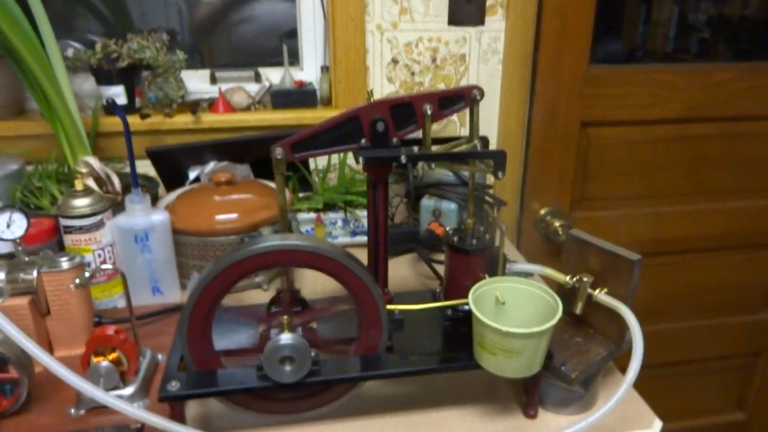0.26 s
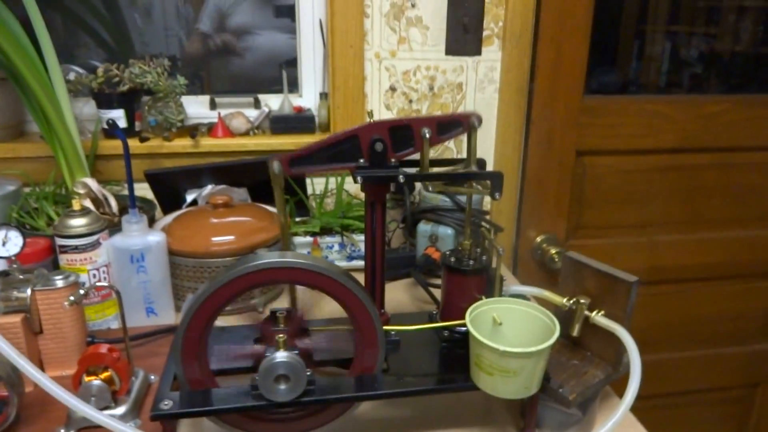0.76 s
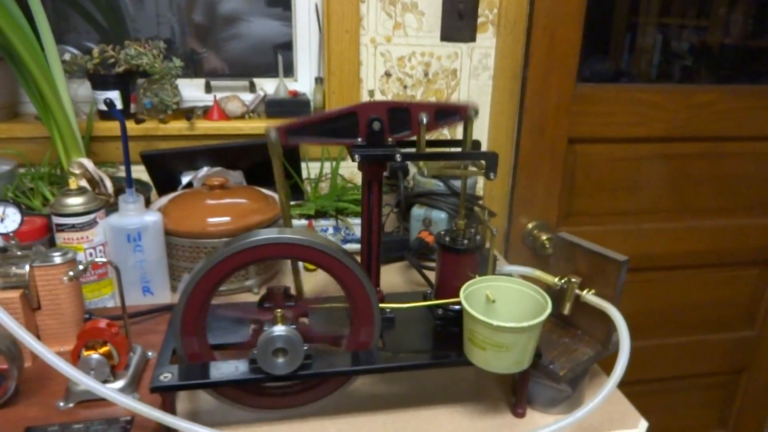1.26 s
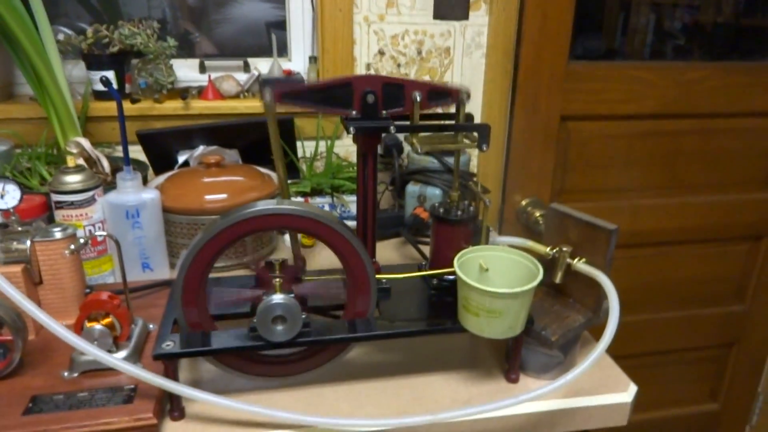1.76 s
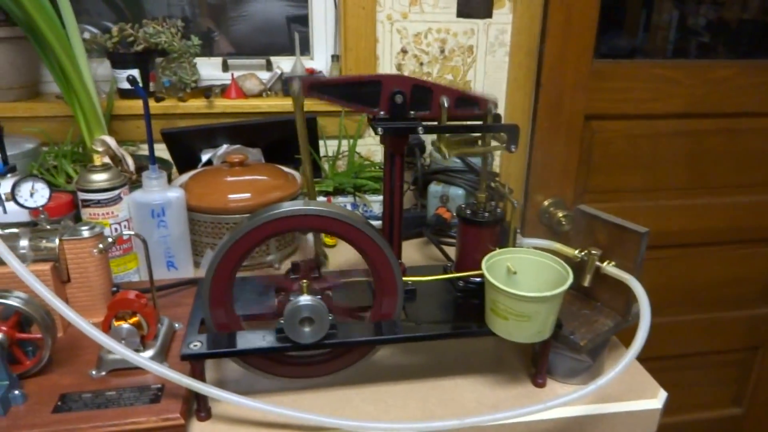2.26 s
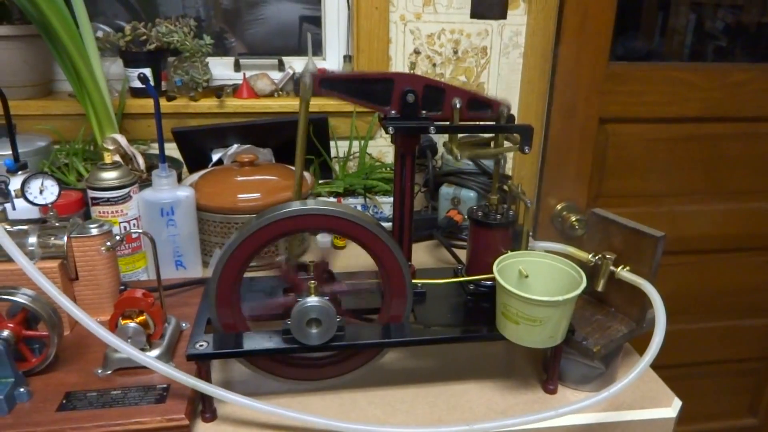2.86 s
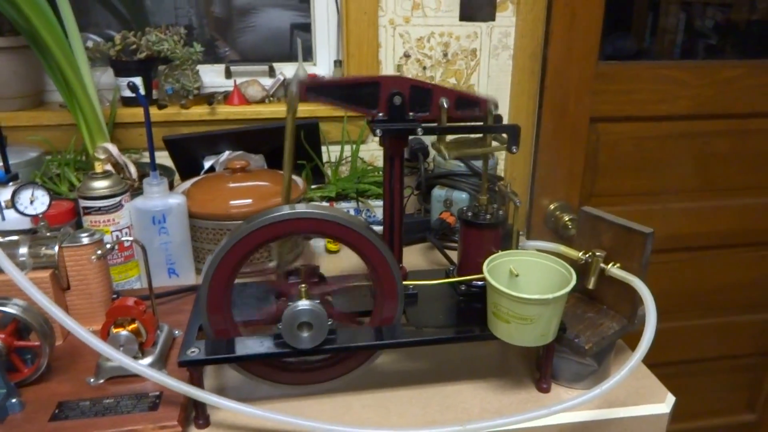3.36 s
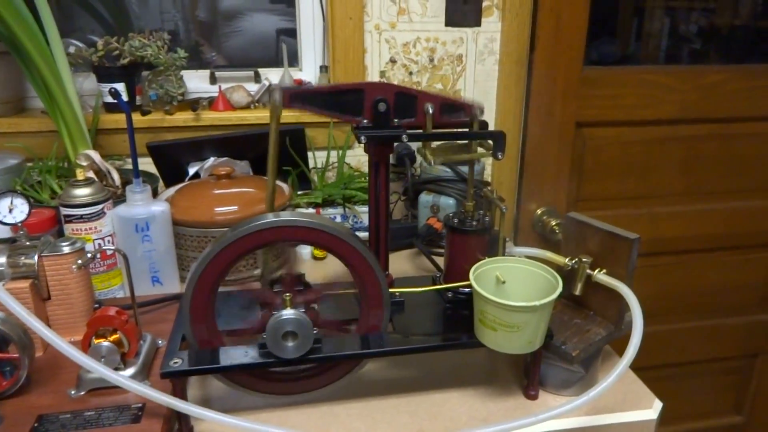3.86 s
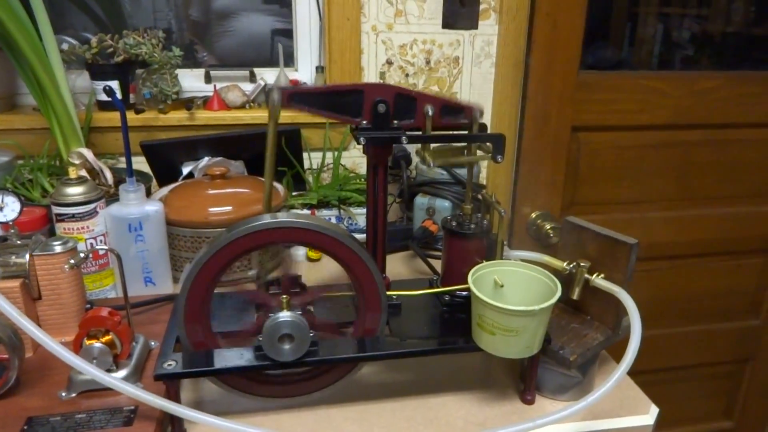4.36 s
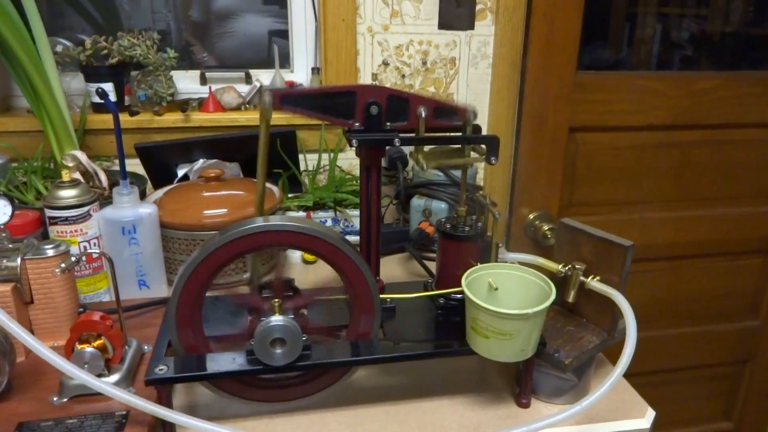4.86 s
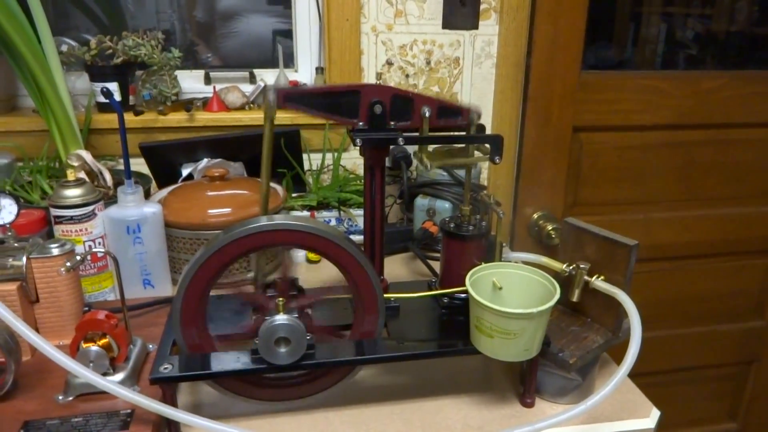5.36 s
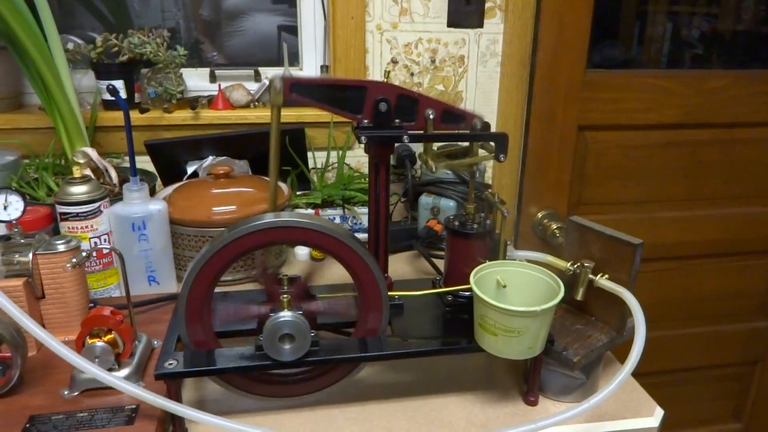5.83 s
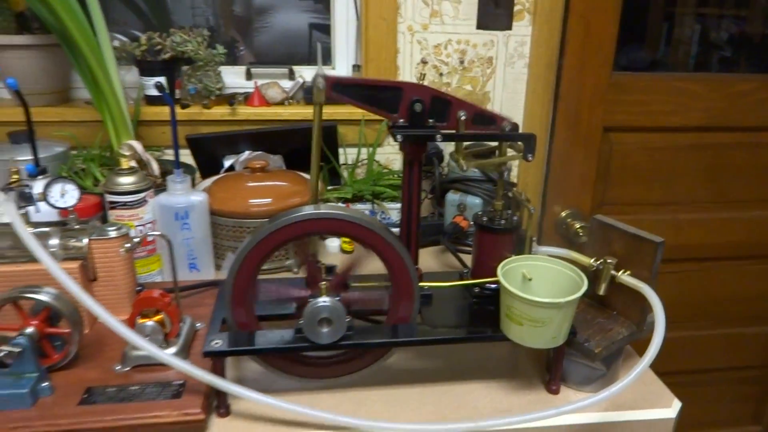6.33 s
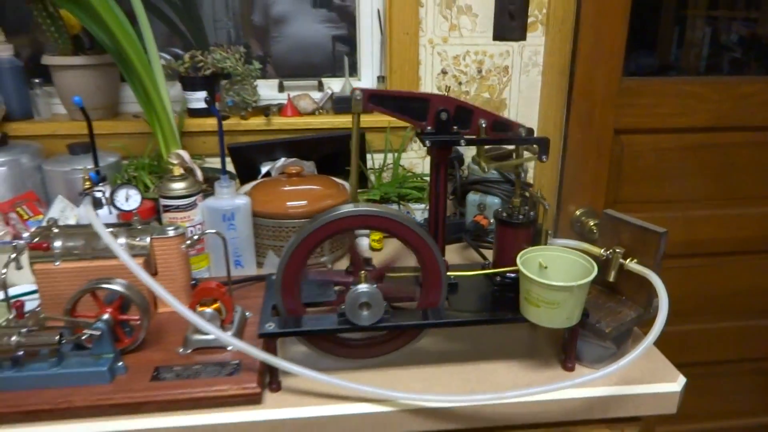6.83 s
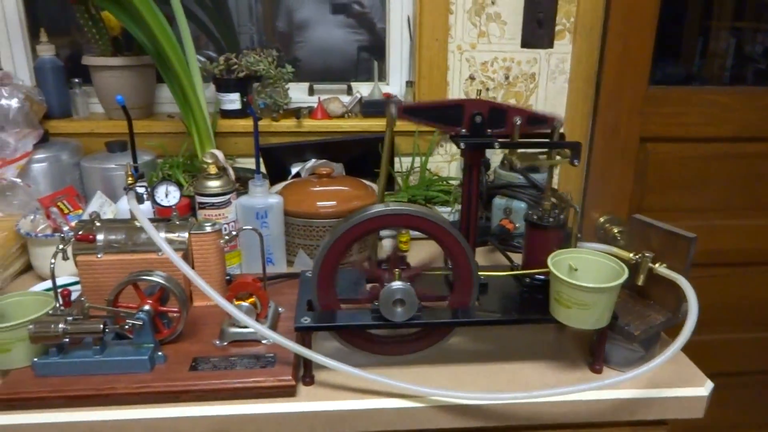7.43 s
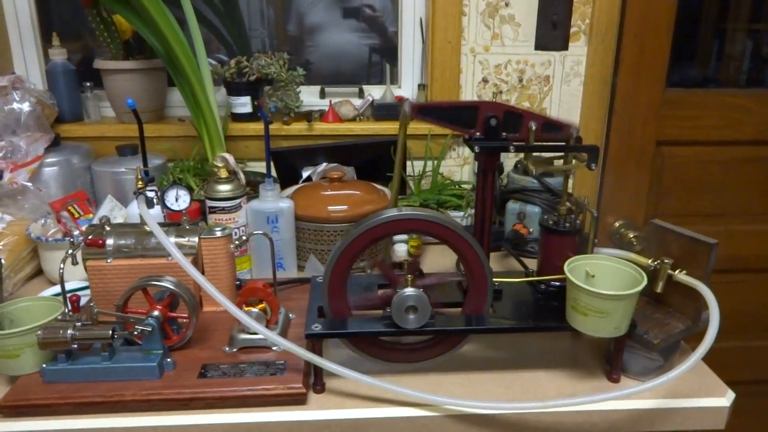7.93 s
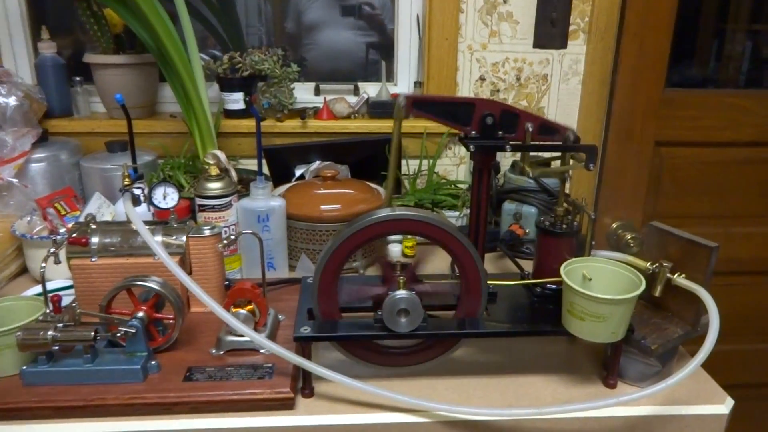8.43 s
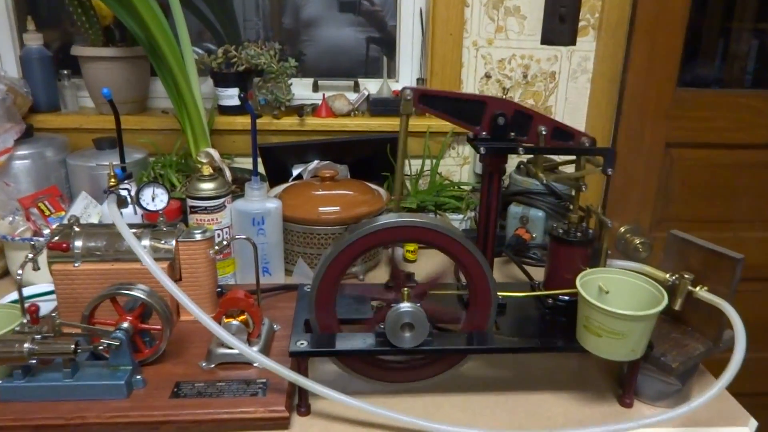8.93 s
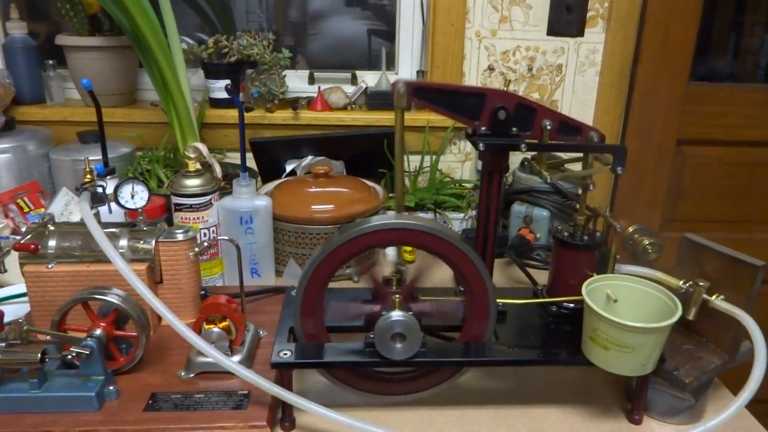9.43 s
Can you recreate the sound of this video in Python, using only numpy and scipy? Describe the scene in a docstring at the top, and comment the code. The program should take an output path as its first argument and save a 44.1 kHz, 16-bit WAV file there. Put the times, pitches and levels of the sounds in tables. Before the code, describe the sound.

Rhythmic mechanical knocks and quick puffs of steam come from a small beam engine running on a wooden table, gradually easing its pace.

```python
"""A small beam engine slowing down

The engine runs on a wooden table indoors. Five slack joints knock once a turn, and each impact excites
the modes of base and table. The exhaust chuffs twice a turn as turbulent noise, sputters in between and
pops drops of water in its pipe. The valve port whistles faintly; the room answers softly."""
import sys
import numpy as np
from scipy import signal
from scipy.fft import rfft, irfft, next_fast_len
from scipy.io import wavfile
from scipy.ndimage import uniform_filter1d

SR = 44100
rng = np.random.default_rng(int(sys.argv[2]) if len(sys.argv) > 2 else 0)


def master(y):
    """Save y as 16-bit WAV."""
    cut = np.clip(np.atleast_2d(y).T, -1, 1)
    pcm = np.round(cut * 32767)  # scale
    wavfile.write(sys.argv[1], SR, pcm.astype(np.int16))


N = 427329
TOP_HZ = 15800

# knocks of the two heavy joints: start_s, level_db
CRANK_KNOCKS = [(0.071, -11), (0.517, -12), (0.982, -13), (1.447, -11), (1.91, -12), (2.385, -12),
                (2.868, -13), (3.357, -11.5), (3.849, -11.5), (4.346, -13), (4.85, -12.5), (5.353, -12.5),
                (5.86, -12), (6.372, -11), (6.888, -11.5), (7.409, -13), (7.932, -13), (8.457, -12),
                (8.99, -13.5), (9.553, -13.5)]
PISTON_KNOCKS = [(0.35, -17.5), (0.802, -18.5), (1.265, -16.5), (1.729, -16.5), (2.195, -15.5),
                 (2.678, -18), (3.162, -15.5), (3.655, -15.5), (4.153, -17), (4.654, -16.5), (5.153, -15.5),
                 (5.66, -16), (6.173, -16), (6.685, -16.5), (7.204, -16), (7.724, -15.5), (8.252, -16.5),
                 (8.779, -15), (9.331, -15)]
# modes of base and table: pitch_hz, width_hz
BASE_MODES = [(66, 35), (150, 13), (188, 28), (253, 24), (345, 26), (410, 26), (530, 30), (645, 50),
              (720, 60), (782, 60), (870, 55), (925, 55), (1168, 75), (1280, 85), (1556, 90), (2000, 500)]
# The next three have one row per joint: crank, beam, valve, piston, link.
# drive of each mode: gain_db
MODE_COUPLING = [
    [-12.5, 1.5, -4.5, -1, -2.5, 1.5, -13.5, -7.5, -3, -1, -8.5, -23, -10, -32.5, -18, -45],
    [-21, 1, -8.5, 1, -5.5, -10, -12, -14, -21, -10, -12, -22, -9.5, -11, -18, -22.5],
    [-43, -3.5, 3, -4, -28, -41.5, -14, -1, -18, -1, 3, 2.5, -6.5, -13, -30.5, -80],
    [-39, 0, -7, -0.5, -2.5, -7, -14.5, -1, 1, -4.5, -6.5, -3.5, -7, -9.5, -9.5, -26],
    [-34, -3, -6, 2.5, -2, -21, -43, -4, -3, -6, -2.5, -3, -18, -11.5, -16, -27],
]
# contacts within one knock: delay_s, level_db
REBOUNDS = [
    [(.001, -2), (.005, -10.5), (.012, -1), (.031, -6.5), (.046, -12.5)],
    [(0, 0), (.009, -1.5), (.03, -9)],
    [(0, -5), (.007, -9.5)],
    [(0, -3.5), (.004, -1.5), (.009, -4.5), (.033, -9.5)],
    [(0, -2), (.005, -2.5), (.010, -1)],
]
# contact hardness, lower for heavy, oiled joints: cutoff_hz
CONTACT_CUTOFFS = [1140, 1990, 3950, 1980, 3900]


def knocks(boom_db=-3):
    """Modal superposition: every joint drives the same modes, each with its own weights."""
    beam = each_turn(phase=.139, level_db=-16.5, spread_db=.27)
    valve = each_turn(phase=.46, level_db=-31, spread_db=4)
    link = each_turn(phase=.818, level_db=-20.5, spread_db=.46)
    joints = [CRANK_KNOCKS, beam, valve, PISTON_KNOCKS, link]
    out = np.zeros(N)
    for strikes, rebounds, coupling, cutoff_hz in zip(joints, REBOUNDS, MODE_COUPLING, CONTACT_CUTOFFS):
        ring = resonances([(*mode, db) for mode, db in zip(BASE_MODES, coupling)])
        force = joint_force(strikes, rebounds)
        out += filtered(force, lambda hz: ring(hz) / (1 + 1j * hz / cutoff_hz) ** 2)
    # the hollow under the table swells after a blow and booms on
    return out + filtered(out, resonances([(*BASE_MODES[1], boom_db)]))


def joint_force(strikes, rebounds, gain_db=44, scatter_db=.84, chatter_db=-28, grind_db=-26):
    """Backlash: a slack joint strikes, rebounds and chatters while its bearing grinds steadily."""
    blows, envelope = np.zeros((2, N + SR))
    t = np.arange(SR // 8) / SR
    for start_s, db in strikes:
        envelope[round(start_s * SR):][:len(t)] += amp(db + gain_db + chatter_db) * np.exp(-t / .022)
        for delay_s, rebound_db in rebounds:
            blow_db = db + gain_db + rebound_db + scatter_db * rng.standard_normal()
            blows[round((start_s + delay_s) * SR)] += amp(blow_db)
    # light chatter is too quick to move the heavy low modes
    chatter = filtered(envelope[:N] * rng.standard_normal(N), lambda hz: highpass(hz, 400) ** 2)
    return blows[:N] + chatter + amp(grind_db) * patchy_noise(depth_db=3.5)


def each_turn(phase, level_db, spread_db, piston_phase=.607):
    """Phase locking: a light joint knocks a fixed fraction of a turn after the crank."""
    crank_s, piston_s = np.array(CRANK_KNOCKS)[:, 0], np.array(PISTON_KNOCKS)[:, 0]
    turns = np.arange(len(crank_s))
    known_turns = np.sort(np.r_[turns, np.arange(len(piston_s)) + piston_phase, len(turns)])
    known_s = np.sort(np.r_[crank_s, piston_s, 2 * crank_s[-1] - crank_s[-2]])
    starts = np.interp(turns + phase, known_turns, known_s)
    return [(s, level_db + spread_db * rng.standard_normal()) for s in starts if s < N / SR]


# exhaust puffs at each end of the stroke: start_s, level_db, fade_s
CHUFFS = [(0.066, -11.5, 0.04), (0.31, -10, 0.067), (0.5142, -11.5, 0.081), (0.778, -12.5, 0.067),
          (0.974, -11.5, 0.07), (1.2286, -10.5, 0.058), (1.4361, -13, 0.07), (1.695, -12.5, 0.077),
          (1.885, -15, 0.12), (2.164, -11.5, 0.053), (2.3725, -13, 0.08), (2.6394, -14, 0.089),
          (2.854, -12.5, 0.053), (3.126, -15.5, 0.078), (3.3403, -16.5, 0.12), (3.625, -11.5, 0.067),
          (3.8357, -12.5, 0.055), (4.1136, -12, 0.061), (4.3375, -13, 0.11), (4.6199, -12.5, 0.067),
          (4.821, -15, 0.094), (5.1074, -15, 0.089), (5.329, -12.5, 0.088), (5.627, -12, 0.067),
          (5.8491, -13, 0.08), (6.1325, -12.5, 0.081), (6.3494, -15.5, 0.13), (6.648, -11.5, 0.062),
          (6.8728, -14.5, 0.082), (7.172, -15.5, 0.079), (7.389, -16, 0.082), (7.695, -15, 0.072),
          (7.9174, -12.5, 0.075), (8.2174, -13.5, 0.077), (8.4457, -12.5, 0.054), (8.738, -12, 0.082),
          (8.9794, -15, 0.088), (9.296, -13.5, 0.064), (9.5387, -12.5, 0.062)]
# port opening at the crank end, then the piston end: rise_s, lead_s
PORT_OPENINGS = [(0.021, 0.01), (.011, 0.0064)]
# spurts of wet steam between chuffs: start_s, level_db, fade_s
SPUTTERS = [(0.0054, -20.5, 0.13), (0.124, -15.5, 0.049), (0.2244, -26, 0.059), (0.2643, -17.5, 0.047),
            (0.4289, -20.5, 0.05), (0.6394, -25.5, 0.063), (0.7193, -21.5, 0.15), (0.898, -23.5, 0.061),
            (1.0694, -21, 0.05), (1.1807, -24, 0.042), (1.3194, -20.5, 0.052), (1.3894, -25, 0.057),
            (1.5384, -21, 0.05), (1.6282, -23, 0.058), (1.7994, -24, 0.082), (2.1106, -19.5, 0.031),
            (2.2588, -19.5, 0.059), (2.4902, -20.5, 0.052), (2.5894, -22, 0.14), (2.9262, -19, 0.04),
            (2.9816, -23.5, 0.042), (3.055, -25, 0.14), (3.273, -22, 0.041), (3.5224, -25, 0.081),
            (3.5694, -16.5, 0.035), (3.7424, -23, 0.054), (3.7993, -21.5, 0.04), (3.9155, -21.5, 0.035),
            (3.9654, -23.5, 0.039), (4.0287, -24.5, 0.07), (4.1994, -21.5, 0.054), (4.2916, -22, 0.05),
            (4.442, -18.5, 0.029), (4.5311, -24.5, 0.069), (4.5885, -22.5, 0.05), (4.7194, -22.5, 0.045),
            (5.0215, -24, 0.12), (5.2694, -27, 0.064), (5.5687, -20, 0.029), (5.7728, -23, 0.094),
            (5.9194, -18, 0.034), (6.0526, -21, 0.064), (6.2991, -22, 0.068), (6.5494, -30, 0.067),
            (6.5994, -21.5, 0.037), (6.7294, -22.5, 0.072), (6.8154, -23.5, 0.087), (6.979, -21, 0.037),
            (7.0818, -24.5, 0.058), (7.3282, -23, 0.044), (7.4594, -20.5, 0.033), (7.5094, -25, 0.063),
            (7.5712, -25.5, 0.054), (7.6194, -23.5, 0.089), (8.0092, -16.5, 0.037), (8.0875, -22, 0.032),
            (8.165, -22, 0.13), (8.3294, -24, 0.043), (8.519, -21.5, 0.05), (8.5694, -24.5, 0.055),
            (8.6477, -23, 0.039), (8.6894, -23, 0.043), (8.8774, -23, 0.031), (8.9401, -24.5, 0.05),
            (9.0894, -19.5, 0.05), (9.1494, -27, 0.04), (9.2015, -27, 0.11), (9.403, -21.5, 0.036),
            (9.4394, -25.5, 0.093), (9.639, -29, 0.032)]


def steam_flow(fade_shape=1.34, leak_db=-40, sputter_rise_s=.0043, sputter_lead_s=.0035):
    """Incoherent addition: puffs and a slight leak sum in power to give the flow envelope."""
    power, t = np.zeros(N + SR), np.arange(SR // 2) / SR
    puffs = [(*row, *PORT_OPENINGS[k % 2]) for k, row in enumerate(CHUFFS)]
    puffs += [(*row, sputter_rise_s, sputter_lead_s) for row in SPUTTERS]
    for start_s, db, fade_s, rise_s, lead_s in puffs:
        puff = amp(db) * (1 - np.exp(-t / rise_s)) * np.exp(-(t / fade_s) ** fade_shape)
        # flow begins just before it is heard
        power[round((start_s - lead_s) * SR):][:len(t)] += puff ** 2
    return np.sqrt(power[:N] + amp(2 * leak_db))


# relative spectrum of the jet: frequency_hz, density_db
JET_SPECTRUM = [(1200, -48), (2500, -11), (3500, -2), (4900, -1), (5600, -2.5), (6200, -1.5), (7400, -4.5),
                (8250, 0.5), (9000, -3), (9860, 2.5), (11000, -1.5), (11900, 0.5), (13000, -1), (14200, 1),
                (16000, -9)]
# modes of the steam chest: pitch_hz, width_hz, gain_db
CHEST_MODES = [(583, 277, -1.5), (943, 257, 3.5), (1248, 262, 1), (3100, 290, -3)]


def exhaust(flow, jet_db=-9, chest_db=-3, chest_exponent=1.556):
    """Turbulence: the jet hisses in step with the flow; the chest's resonance grows more steeply."""
    hiss = patchy_noise(depth_db=2)
    jet = unit(filtered(hiss, lambda hz: amp(along(JET_SPECTRUM, hz)) * (hz < TOP_HZ)))
    chest = unit(filtered(patchy_noise(depth_db=4), resonances(CHEST_MODES)))
    return amp(jet_db) * flow * jet + amp(chest_db) * flow ** chest_exponent * chest


# drops bursting in the pipe: start_s, level_db
DROPS = [(0.1408, -12), (0.5824, -13), (1.694, -8.5), (3.403, -23), (3.4553, 0), (4.446, -6), (5.0207, -5),
         (5.5692, -39), (8.739, -1)]
# modes of the pipe: pitch_hz, width_hz, gain_db
PIPE_MODES = [(3300, 360, -9.5), (6100, 330, -6), (9600, 290, -3), (12700, 2200, -25)]


def water_pops(gain_db=9, decay_s=.00084, bounce_s=.0058, bounce_db=-2):
    """Impulse response: a bursting drop rings the pipe, and bounces to burst again a moment later."""
    bursts, t = np.zeros(N + SR), np.arange(SR // 100) / SR
    for start_s, db in DROPS:
        crackle = np.sign(rng.standard_normal(len(t)))
        bursts[round(start_s * SR):][:len(t)] += amp(db + gain_db) * np.exp(-t / decay_s) * crackle
    ring = filtered(bursts[:N], resonances(PIPE_MODES))
    return filtered(ring, lambda hz: 1 + amp(bounce_db) * np.exp(-2j * np.pi * hz * bounce_s))


# chirps as the valve port cracks open: start_s, level_db
PORT_CHIRPS = [(0.486, -28.5), (0.722, -35), (0.951, -34), (1.183, -30.5), (1.411, -36), (1.644, -34),
               (1.871, -39), (2.111, -35), (2.35, -36), (2.596, -36), (3.079, -33.5), (3.579, -42),
               (4.065, -34), (4.564, -31), (5.074, -33), (5.574, -38), (6.082, -37), (8.163, -45),
               (8.684, -31)]


def port_whistle(flow, pitch_hz=3150, width_hz=106, gain_db=-26, rise_s=.00088, decay_s=.016):
    """Narrow-band resonance: the port turns flow noise into a breathy tone that flares as it opens."""
    chirps, t = np.zeros(N + SR), np.arange(SR // 2) / SR
    for start_s, db in PORT_CHIRPS:
        chirps[round(start_s * SR):][:len(t)] += amp(db) * (1 - np.exp(-t / rise_s)) * np.exp(-t / decay_s)
    tone = unit(filtered(patchy_noise(depth_db=1.5), resonances([(pitch_hz, width_hz, 0)])))
    return (amp(gain_db) * flow + chirps[:N]) * tone


# relative spectrum of the murmur: frequency_hz, density_db
MURMUR_SPECTRUM = [(15, -34), (25, -16.5), (97, -18), (166, -18.5), (476, -19), (775, -30), (1940, -31.5),
                   (3160, -30), (7000, -27), (14000, -44), (16000, -50)]


def murmur(gain_db):
    """Spectral shaping: steady broadband noise, strongest in the bass."""
    noise = filtered(patchy_noise(depth_db=2), lambda hz: amp(along(MURMUR_SPECTRUM, hz)))
    return amp(gain_db) * unit(noise)


# reverberation time of the room: frequency_hz, t60_s
ROOM_DECAY = [(150, 0.16), (2000, 0.16), (12000, 0.05)]


def room(x):
    """Diffuse reverberation: two unrelated tails decay exponentially, each frequency at its own rate."""
    out, step = np.zeros((2, N + SR)), SR // 4
    # tails are redrawn every quarter second so the room sounds smooth and uncoloured
    for start in range(0, N, step):
        hz, t, spectra = signal.stft(rng.standard_normal((2, SR // 3)), SR, nperseg=256)
        decay = amp(-60 * t / along(ROOM_DECAY, hz)[:, None])
        tails = signal.istft(spectra * decay, SR, nperseg=256)[1]
        answer = signal.fftconvolve(x[None, start:start + step], tails / np.linalg.norm(tails[0]), axes=1)
        out[:, start:start + answer.shape[1]] += answer
    return out[:, :N]


def amp(db):
    """Decibels as an amplitude ratio."""
    return 10 ** (np.asarray(db) / 20)


def unit(x):
    """Normalisation to unit RMS."""
    return x / np.sqrt(np.mean(x ** 2) + 1e-20)


def along(points, hz):
    """Interpolation on a log frequency axis."""
    known_hz, values = np.transpose(points)
    return np.interp(np.log(hz + 1), np.log(known_hz + 1), values)


def filtered(x, response):
    """Linear filtering: the spectrum times a frequency response."""
    size = next_fast_len(N + SR // 2)
    return irfft(rfft(x, size) * response(np.fft.rfftfreq(size, 1 / SR)), size)[..., :N]


def highpass(hz, cutoff_hz):
    """First-order high-pass response."""
    return 1j * hz / (cutoff_hz + 1j * hz)


def resonances(modes):
    """Damped oscillators: their responses sum with alternating signs."""
    return lambda hz: sum((-1) ** k * amp(db) * 1j * hz * width / (pitch ** 2 - hz ** 2 + 1j * hz * width)
                          for k, (pitch, width, db) in enumerate(modes))


def patchy_noise(depth_db):
    """Random modulation: white noise flickers in patches of time and frequency."""
    spectra = signal.stft(rng.standard_normal(N), nperseg=256)[2]
    patches = uniform_filter1d(rng.standard_normal(spectra.shape), 3, axis=0)
    patches = uniform_filter1d(patches, 8, axis=1)
    return unit(signal.istft(spectra * amp(depth_db * unit(patches)), nperseg=256)[1][:N])


# filter for the left-right difference: frequency_hz, gain_db
SIDE_GAINS = [(60, -39), (150, -33), (380, -30.5), (950, -23), (2380, -25.5), (5980, -32.5), (15000, -24.5)]


def scene():
    """Mid-side stereo: both channels share the direct sound and differ only slightly."""
    flow = steam_flow()
    direct = knocks() + exhaust(flow) + port_whistle(flow) + water_pops()
    direct += murmur(gain_db=-41)  # flywheel, leaks and room
    mid_tail, side_tail = room(direct)
    # the small room adds little bass
    mid = direct + amp(-10) * filtered(mid_tail, lambda hz: highpass(hz, 500))
    width_noise = murmur(gain_db=-23.5)  # faint steady noise for slight stereo width
    side = filtered(amp(3) * side_tail + width_noise, lambda hz: amp(along(SIDE_GAINS, hz)))
    return np.array([mid + side, mid - side]) * amp([[-.2], [.2]])


def record(dry):
    """Band limiting: nothing above TOP_HZ passes."""
    return filtered(dry, lambda hz: hz < TOP_HZ)


dry = scene()
out = record(dry)
master(out)
```